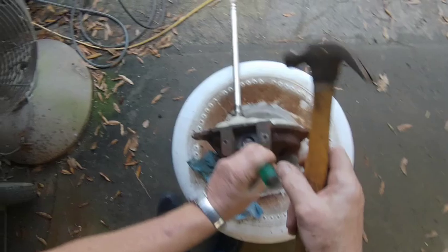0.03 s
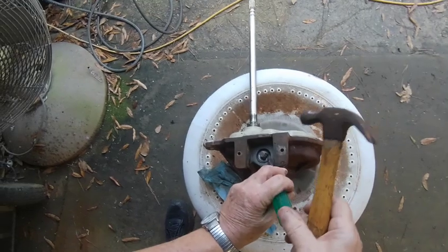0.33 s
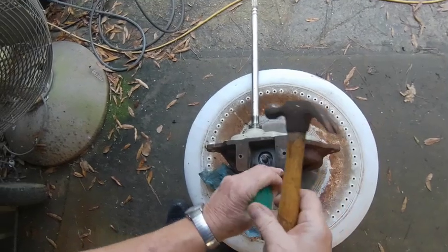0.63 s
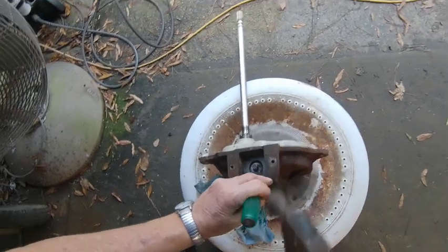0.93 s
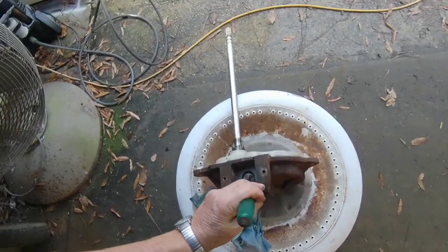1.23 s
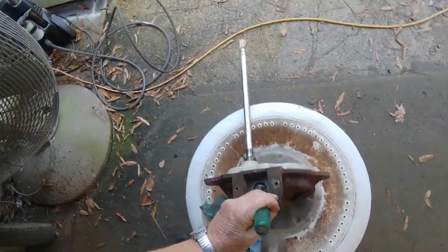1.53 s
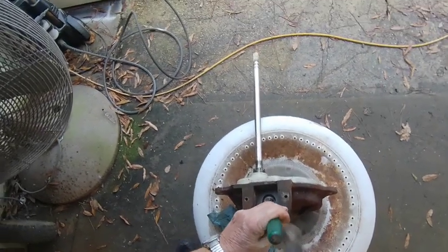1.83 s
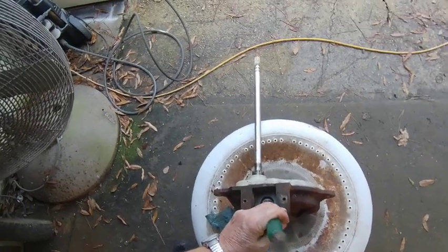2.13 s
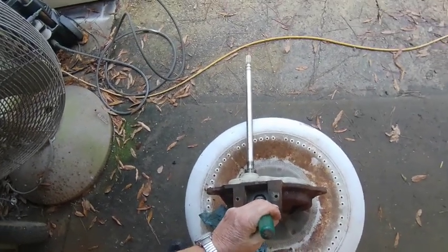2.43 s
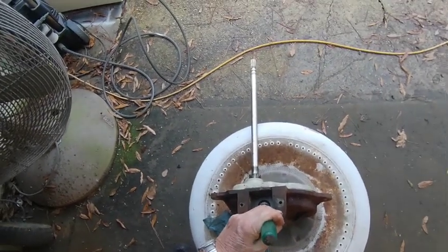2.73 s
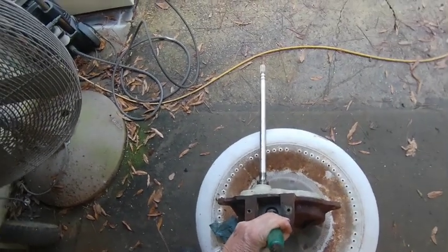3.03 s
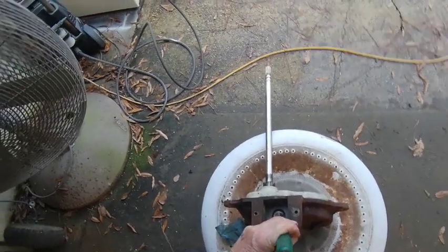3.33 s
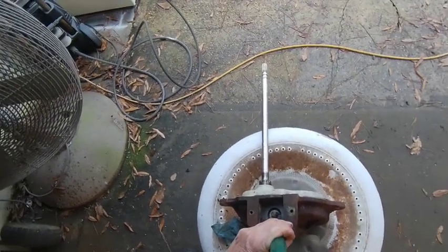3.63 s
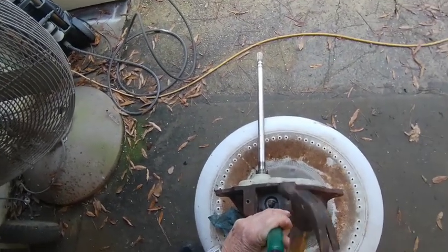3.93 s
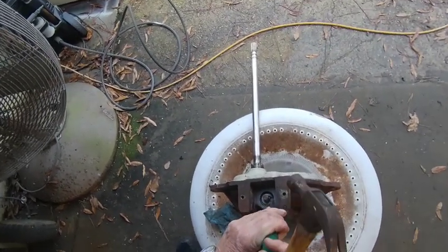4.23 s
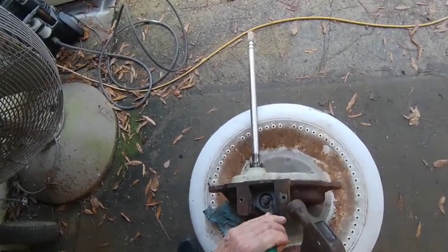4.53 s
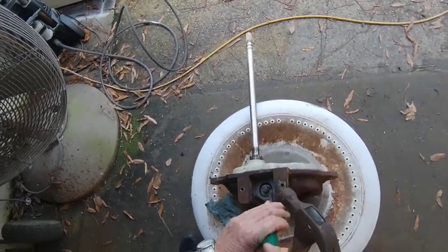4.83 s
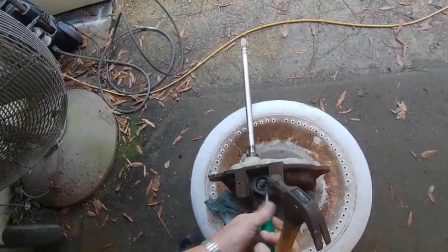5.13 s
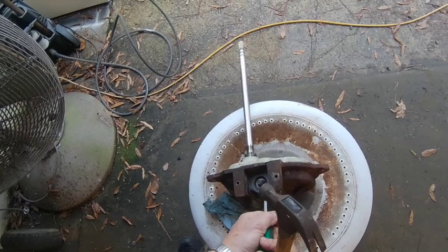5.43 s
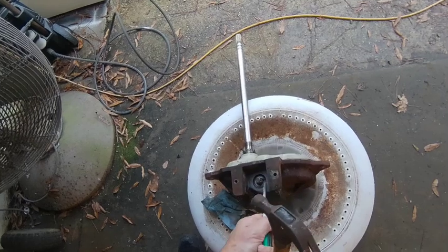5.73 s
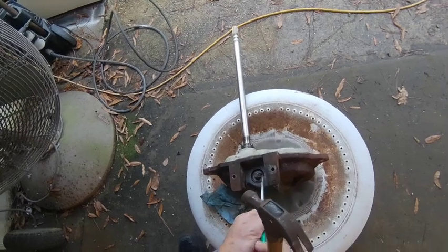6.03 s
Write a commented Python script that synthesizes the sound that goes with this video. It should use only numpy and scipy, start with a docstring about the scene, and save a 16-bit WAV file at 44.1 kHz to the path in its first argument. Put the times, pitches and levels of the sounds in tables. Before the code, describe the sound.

Close up in a yard, eight evenly paced hammer blows drive a steel tool into a cast metal housing. The first is gentle, the later ones hard and slightly distorted, each with a sharp clank, a short ring and a hollow thud from the tub underneath. Afterwards the housing wobbles in a few rattling knocks while the tool tip clicks and scrapes lightly, over a faint far machine hum.

```python
"""In a yard, a claw hammer drives a screwdriver, used as a punch, into a cast gearbox that rests on
an upturned washer tub. Eight blows crack, ring through the steel and make the tub boom, overloading
the close microphone. Then the gearbox rocks on the tub and the tip is set anew with light clicks.
Hands and tool scuff now and then, and a far machine hums under it all."""
import sys
import numpy as np
from scipy import signal
from scipy.fft import rfft, irfft, next_fast_len
from scipy.io import wavfile

SR = 44100
rng = np.random.default_rng(int(sys.argv[2]) if len(sys.argv) > 2 else 0)


def waveform_to_disk(signal):
    """Save audio, clipped to [-1, 1], as 16-bit WAV at the path in sys.argv[1]."""
    frames = np.transpose(np.atleast_2d(signal))
    scaled = np.clip(frames, -1, 1) * 32767
    samples = np.round(scaled).astype(np.int16)
    wavfile.write(sys.argv[1], SR, samples)


N = 272449
TIME = np.arange(N) / SR
AGE = np.arange(int(.6 * SR)) / SR   # seconds since a hit
CUTOFF_HZ = 15900


def from_db(db):
    """Turn decibels into a gain."""
    return 10 ** (np.asarray(db) / 20)


def at_hz(points, hz):
    """Read between the rows of a table on a log-frequency axis."""
    where, value = np.transpose(points)
    return np.interp(np.log(np.maximum(hz, 1)), np.log(where), value)


def fade(age, t60):
    """Die away by 60 dB in t60 seconds, the ring time."""
    return np.exp(-np.log(1000) * age / t60)


def add(out, start_s, sound):
    """Mix a sound in from start_s on."""
    start = round(start_s * SR)
    part = sound[..., :N - start]
    out[:, start:start + part.shape[-1]] += part


def wavering(hz, waver, count):
    """A tone of rms 1 whose phase wanders by about waver radians, count times in all."""
    turns_s = np.linspace(0, TIME[-1], count)
    drift = waver * np.interp(TIME, turns_s, rng.standard_normal(count))
    return np.sqrt(2) * np.sin(2 * np.pi * hz * TIME + drift)


# How alike the two sides are. Each row: frequency in Hz, likeness (1 is identical).
STEREO_LIKENESS = [(100, 1), (400, 1), (1000, 0.99), (3000, 0.99), (7000, 0.88), (15000, 0.25)]
def noise(spectrum, size=len(AGE), low_hz=10, high_hz=SR / 2, colour=1, width=1):
    """Stereo noise with a given spectrum; the sides are less alike in the treble."""
    hz = np.fft.rfftfreq(size, 1 / SR)
    mid, side = rfft(rng.standard_normal((2, size)))
    alike = np.clip(1 - width * (1 - at_hz(STEREO_LIKENESS, hz)), 0, 1)
    pair = np.sqrt(1 + alike) * mid + np.sqrt(1 - alike) * side * [[1], [-1]]
    gain = colour * from_db(at_hz(spectrum, hz)) * (hz >= low_hz) * (hz < high_hz)
    return irfft(pair * gain, size) * np.sqrt(SR) / 2


def struck(modes, spread_db, hardness_hz=SR):
    """A hit wakes each mode (natural tone) by a random amount; a soft hit misses the high ones."""
    hz, db, t60 = np.transpose(modes)[:, :, None]
    gain = from_db(db + spread_db * rng.standard_normal(hz.shape)) / np.hypot(1, hz / hardness_hz)
    return np.sum(gain * np.sin(2 * np.pi * hz * AGE) * fade(AGE, t60), axis=0)


# Outdoor rumble. Each row: frequency in Hz, level in dB per Hz.
YARD_AIR = [(20, -62), (55, -61), (100, -76.5), (160, -78), (250, -82), (450, -86.5), (1000, -87.5),
            (1600, -93), (2200, -98), (4000, -103), (7000, -110), (11500, -110), (16000, -114)]
# The machine's hum. Each row: pitch in Hz, rms level in dB.
HUM_TONES = [(70, -53), (173, -59.5), (404, -65.5)]
def yard(idle_db=-56.5, running_db=-49, on_s=0.37, off_s=5.34, rise_s=0.066, fall_s=.5):
    """Outdoor rumble and the hum of a far machine, whose low drone swells, holds and sinks back."""
    hum = sum(from_db(db) * wavering(hz, waver=0.52, count=60) for hz, db in HUM_TONES)
    running = np.clip(np.minimum((TIME - on_s) / rise_s, 1 - (TIME - off_s) / fall_s), 0, 1)
    drone = from_db(idle_db + running * (running_db - idle_db)) * wavering(hz=131, waver=0.69, count=60)
    air = noise(YARD_AIR, size=next_fast_len(N), width=.15)[:, :N]
    return air + hum + drone


# Scuffs. Each row: middle in seconds, half length in seconds, level in dB, band centre in Hz.
SCUFFS = [(0.266, 0.0011, -43, 12300), (.326, 0.0021, -38, 12300), (0.894, .05, -59, 12300),
          (0.954, 0.0023, -44.5, 1370), (4.127, 0.019, -55.5, 12500), (4.461, 0.0083, -45.5, 1790),
          (5.244, .11, -53, 2607)]
def scuffs(half_width_octaves=0.45):
    """Hand and tool slide, each time with a short swell of hiss."""
    out = np.zeros(N)
    ratio = 2 ** half_width_octaves
    for middle_s, half_s, db, hz in SCUFFS:
        band = signal.butter(2, [hz / ratio, hz * ratio], "band", fs=SR, output="sos")
        hiss = signal.sosfilt(band, rng.standard_normal(N))
        out += from_db(db) * hiss / hiss.std() * np.exp(-((TIME - middle_s) / half_s) ** 2)
    return out


# Metal chattering on metal. Each row: frequency in Hz, level in dB per Hz.
CLATTER_SPECTRUM = [(150, -39), (400, -47), (800, -47), (2000, -41), (4000, -48), (6500, -47),
                    (9000, -50.5), (12000, -58), (16000, -55.5)]
def clatter(t60, colour=1):
    """Loose parts chatter: tones too crowded to tell apart, all dying at one rate."""
    return noise(CLATTER_SPECTRUM, colour=colour) * fade(AGE, t60)


# Tones of the gearbox landing on the tub. Each row: pitch in Hz, level in dB, ring time in seconds.
LANDING_MODES = [(150.7, -32.5, 0.3), (197, -30, 0.12), (255.9, -25.5, 0.15), (316.5, -38, 0.18),
                 (460.4, -30.5, 0.16), (511, -44, 0.2), (623, -40.5, 0.044), (940, -38, 0.17),
                 (1340, -56, 0.098), (1776, -64, 0.12), (1900, -41, 0.15), (2130, -34.5, 0.24),
                 (2390, -35, 0.091), (2716, -43.5, 0.23), (3553, -53, 0.44)]
# Bouts of rocking. Each row: start in seconds, level in dB, hardness in Hz (higher is brighter).
ROCKING_BOUTS = [(3.668, 0, 796), (3.816, -14.5, 1400), (4.11, -9, 1500), (4.93, -23.5, 2000),
                 (5.3741, -0.5, 2640), (5.681, -27.5, 1500)]
def gearbox_rocking(period_s=.079, loss_db=8.5, softening=0.42, rattle_db=-24):
    """The gearbox lands three times on its two edges, ever weaker and softer."""
    out = np.zeros((2, N))
    for start_s, db, first_hardness_hz in ROCKING_BOUTS:
        for landing in range(3):
            hardness_hz = first_hardness_hz * softening ** landing
            lowpass = signal.butter(2, hardness_hz, fs=SR)
            for late_s, edge_db in ((0, 0), (.023, -8)):   # one edge, then the other
                rattle = from_db(rattle_db) * signal.lfilter(*lowpass, clatter(t60=0.23))
                knock = struck(LANDING_MODES, spread_db=7.5, hardness_hz=hardness_hz)
                gain = from_db(db - landing * loss_db + edge_db)
                add(out, start_s + landing * period_s + late_s, gain * (knock + rattle))
    return out


# Touches of the tip. Each row: start in seconds, level in dB.
TIP_TOUCHES = [(.306, -29), (.327, -23.5), (.483, -38.5), (4.11, -35), (4.931, -42.5), (5.373, -26),
               (5.681, -47)]
def tip_touches(ring_db=-9, boom_db=-4.5):
    """The steel tip clicks on the gearbox; metal and tub answer faintly."""
    out = np.zeros((2, N))
    for start_s, db in TIP_TOUCHES:
        ring = noise(STEEL_SPECTRUM) * fade(AGE, t60=0.1) + gearbox_ring(spread_db=1.5)
        click = clatter(t60=0.013) + from_db(ring_db) * ring
        boom = from_db(boom_db) * tub_boom(spread_db=1.5)
        add(out, start_s, from_db(db) * (click + boom))
    return out


# The screwdriver shaft's tones. Each row: pitch in Hz, relative level in dB.
SHAFT_TONES = [(1694, -6.5), (1739, 2), (1793, -11.5), (1848, -11.5)]
def shaft_ring(t60=2.1):
    """Every blow feeds the long shaft; its close tones beat into one rough note that dies slowly."""
    tone = sum(from_db(db) * wavering(hz, waver=2.8, count=150) for hz, db in SHAFT_TONES)
    power = sum((TIME > start_s) * (from_db(db) * fade(np.abs(TIME - start_s), t60)) ** 2
                for start_s, _, _, db, _ in HAMMER_BLOWS)
    return tone * np.sqrt(power)


# The tub's thud. Each row: frequency in Hz, relative level in dB.
THUD_SPECTRUM = [(60, -50), (100, -42), (135, -42.5), (190, -26.5), (250, -34), (320, -34), (400, -53.5),
                 (700, -71)]
def tub_thud(t60=0.16):
    """A dull knock of the tub wall, made of many damped low tones; it starts at about rms 1."""
    decay = fade(AGE, t60)
    knock = noise(THUD_SPECTRUM) * decay
    return knock / np.sqrt(np.mean(knock ** 2) / np.mean(decay ** 2))


# The tub's tones. Each row: pitch in Hz, level in dB, ring time in seconds.
TUB_MODES = [(171.7, -5, 0.13), (205, -17.5, 0.17), (237.6, -1, 0.21), (256.6, -17, 0.4),
             (289.3, -14.5, 0.15), (316.1, -24, 0.21), (459.7, -22.5, 0.25)]
def tub_boom(spread_db):
    """The hollow tub booms when the gearbox on it is hit."""
    return struck(TUB_MODES, spread_db)


# The gearbox's tones. Each row: pitch in Hz, level in dB, ring time in seconds.
GEARBOX_MODES = [(709, -14, 0.11), (968.4, -22.5, 0.086), (977, -23.5, 0.26), (1150, -18.5, 0.12),
                 (1324, -30, 0.052), (1616, -22.5, 0.18), (1720, -20.5, 0.11), (1853, -19, 0.2),
                 (2090, -25.5, 0.31), (2207, -21.5, 0.29), (2370, -25.5, 0.16), (2550, -28, 0.3),
                 (2720, -22, 0.16), (3640, -29, 0.18), (3800, -26.5, 0.22), (3780, -23, .2),
                 (4224, -22.5, 0.26), (4940, -33, 0.18), (5370, -28.5, .18), (5469, -26.5, .18),
                 (6140, -32.5, 0.1), (6340, -28, 0.093), (10810, -35, 0.19), (11614, -31.5, 0.18),
                 (12100, -29, .14)]
def gearbox_ring(spread_db):
    """The stiff cast housing rings briefly and brightly."""
    return struck(GEARBOX_MODES, spread_db)


# Ringing steel. Each row: frequency in Hz, level in dB per Hz.
STEEL_SPECTRUM = [(150, -63.5), (400, -49.5), (1200, -51.5), (2200, -47), (4000, -53), (6000, -50.5),
                  (9000, -54.5), (11500, -55), (13000, -47), (15500, -56.5)]
# How long it rings. Each row: frequency in Hz, ring time in seconds.
STEEL_RING_TIMES = [(200, 0.16), (700, 0.2), (2500, 0.26), (5500, 0.23), (11000, 0.19), (15000, 0.15)]
def steel_ring(resonances):
    """The crowded tones of tools, gearbox and tub with their echo off the walls; the mids last longest."""
    edges_hz = [100, 500, 1400, 4400, 9000, 13000, 18000]
    ring = 0
    for low, high in zip(edges_hz, edges_hz[1:]):
        band = noise(STEEL_SPECTRUM, low_hz=low, high_hz=high, colour=resonances)
        ring += band * fade(AGE, t60=at_hz(STEEL_RING_TIMES, np.sqrt(low * high)))
    return ring


def crowded_resonances(count=140, half_width_hz=19.0, uneven_db=2.5):
    """The touching parts favour many narrow, scattered bands; returns a gain for each frequency."""
    hz = np.fft.rfftfreq(len(AGE), 1 / SR)
    centres = (np.arange(count) + rng.random(count))[:, None] * CUTOFF_HZ / count
    heights = from_db(uneven_db * rng.standard_normal((count, 1)))
    power = np.sum(heights ** 2 / (1 + ((hz - centres) / half_width_hz) ** 2), axis=0)
    return np.sqrt(power / power.mean())


# Pings. Each row: start in seconds, pitch in Hz, level in dB, ring time in seconds.
GLANCING_PINGS = [(2.534, 12903, -3, .11), (2.8875, 6445, -10, .17), (3.5804, 708, -13, .15)]
def pings():
    """A glancing blow sets a single tone singing."""
    out = np.zeros((2, N))
    for start_s, hz, db, t60 in GLANCING_PINGS:
        add(out, start_s, from_db(db) * np.sin(2 * np.pi * hz * TIME) * fade(TIME, t60))
    return out


# The hammer's crack. Each row: frequency in Hz, level in dB per Hz.
CRACK_SPECTRUM = [(150, -48), (600, -40.5), (2000, -36.5), (4000, -44.5), (8000, -48), (12000, -52.5),
                  (16000, -44.5)]
# The blows. Each row: start in seconds, force in dB, squareness in dB (more crack, less rebound),
# shaft ring in dB, size of the microphone's surge (1 is full scale).
HAMMER_BLOWS = [(1.0676, -23, -2.5, -80, 0.17), (1.405, -7.5, 3.5, -67.5, 0.42),
                (1.7648, -5, 2.5, -56, 0.37), (2.148, -3, 3, -60.5, 1.09),
                (2.5224, 1.5, -6.5, -61.5, 1.494), (2.888, 0.5, 1, -54, 0), (3.2447, 2.5, -3, -45.5, 1.468),
                (3.5799, -1, 1, -50.5, 0.17)]
def hammer(crack_s=0.0025, rebound_at_s=0.016, rebound_s=0.0058, build_s=0.0049):
    """A blow: a crack, a rebound, the tip clattering in its seat, ringing steel and the booming tub."""
    out = np.zeros((2, N))
    build = 1 - np.exp(-AGE / build_s)   # the shock takes a moment to spread through the parts
    for start_s, force_db, square_db, _, _ in HAMMER_BLOWS:
        resonances = crowded_resonances()   # the tip sits differently at every blow
        # Each part has a base level in dB and grows with force at its own rate.
        crack = from_db(6.5 + 0.38 * force_db + square_db) * np.exp(-(AGE / crack_s) ** 2)
        rebound_shape = np.exp(-((AGE - rebound_at_s) / rebound_s) ** 2)
        rebound = from_db(-6 + 1.2 * force_db - square_db) * rebound_shape
        tip = from_db(-4 + 0.51 * force_db) * clatter(t60=0.12, colour=resonances)
        ring = from_db(0.7 + force_db) * (steel_ring(resonances) + gearbox_ring(spread_db=2.5))
        boom = from_db(-4 + 0.31 * force_db) * tub_boom(spread_db=-0.04)
        thud = from_db(-5 + .8 * force_db) * tub_thud()
        contact = (crack + rebound) * noise(CRACK_SPECTRUM)
        add(out, start_s, contact + tip + build * (ring + boom + thud))
    return out


def scene(left_lag_samples=0.26):
    """All sources together; the work lies slightly to the right, so the left side hears it later."""
    left, right = (hammer() + pings() + shaft_ring() + tip_touches() + gearbox_rocking()
                   + scuffs() + yard())
    size = next_fast_len(N)
    delay = np.exp(-2j * np.pi * np.fft.rfftfreq(size) * left_lag_samples)
    late_left = irfft(rfft(left, size) * delay, size)[:N]
    return np.stack([late_left, right])


def microphone_surges(full_scale_swing_s=.011, stretch=2.39, slowing=0.52, settle=2.6):
    """Most blows throw the microphone off its rest point: it swings up and down, ever more slowly."""
    out = np.zeros((2, N))
    for start_s, _, _, _, height in HAMMER_BLOWS:
        if height > 0:
            progress = AGE / (full_scale_swing_s * height ** stretch)   # bigger surges last longer
            swing = np.sin(np.pi * progress ** slowing)
            add(out, start_s, height * swing / (1 + (progress / settle) ** 4))
    return out


# The tone colour of the microphone's openings. Each row: centre in Hz, width in Hz, boost or cut in dB.
MICROPHONE_PORTS = [(4543, 190, -9.5), (7550, 1690, -22), (9770, 700, -9), (11200, 1880, 14.5)]
def record(dry):
    """The microphone's openings colour the sound, its input clips and the highest treble is cut."""
    for hz, width_hz, db in MICROPHONE_PORTS:
        root_gain = from_db(db / 2)
        damping = np.tan(np.pi * width_hz / SR) * np.array([1, 0, -1])
        resonance = np.array([1, -2 * np.cos(2 * np.pi * hz / SR), 1])
        dry = signal.lfilter(resonance + damping * root_gain, resonance + damping / root_gain, dry)
    driven = dry + microphone_surges()
    clipped = driven / (1 + driven ** 8) ** (1 / 8)   # peaks are rounded off at full scale
    lowpass = signal.firwin(101, CUTOFF_HZ, fs=SR)
    return np.clip(signal.fftconvolve(clipped, lowpass[None], "same", axes=1), -1, 1)


dry = scene()
out = record(dry)
waveform_to_disk(out)
```